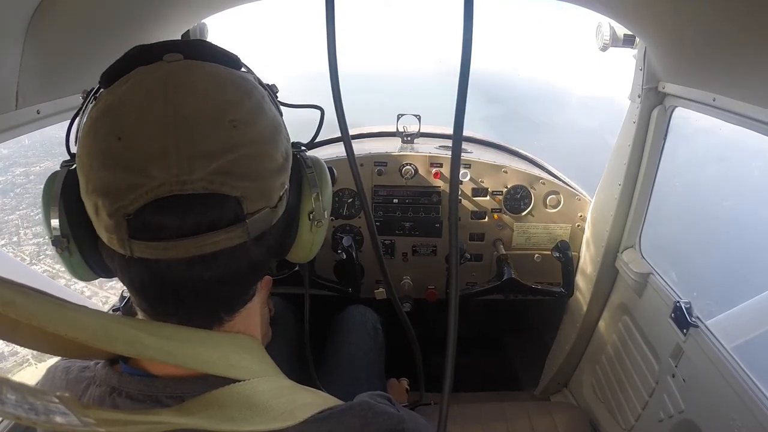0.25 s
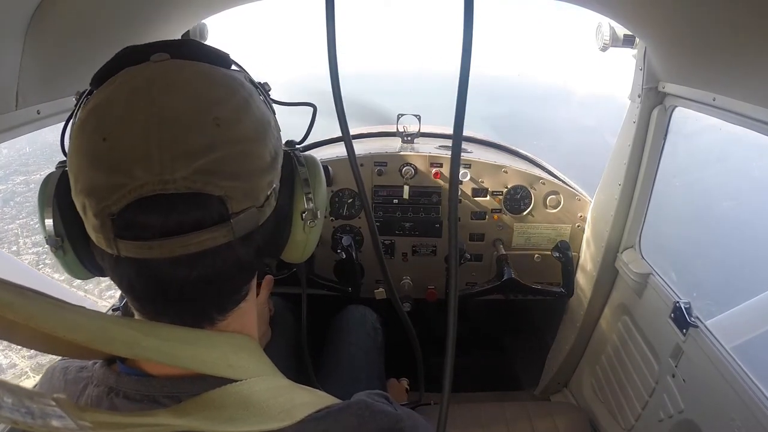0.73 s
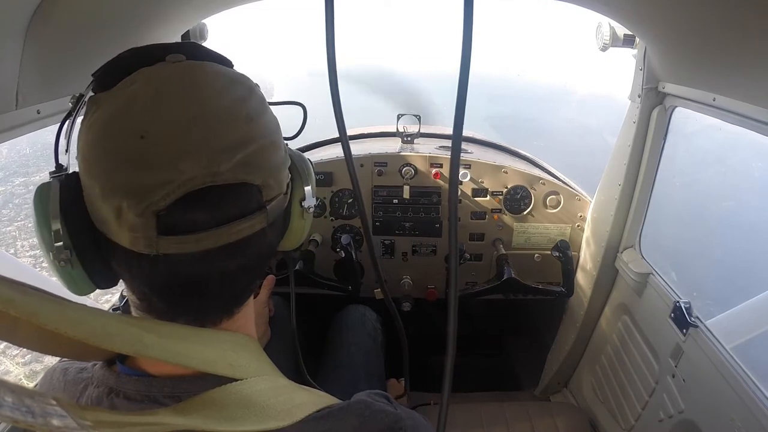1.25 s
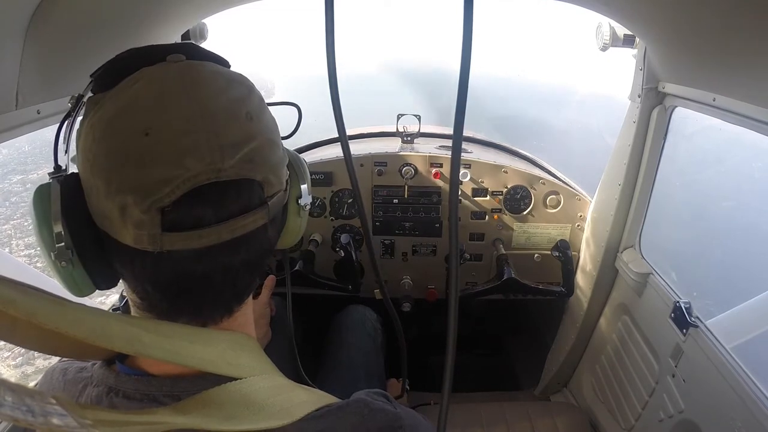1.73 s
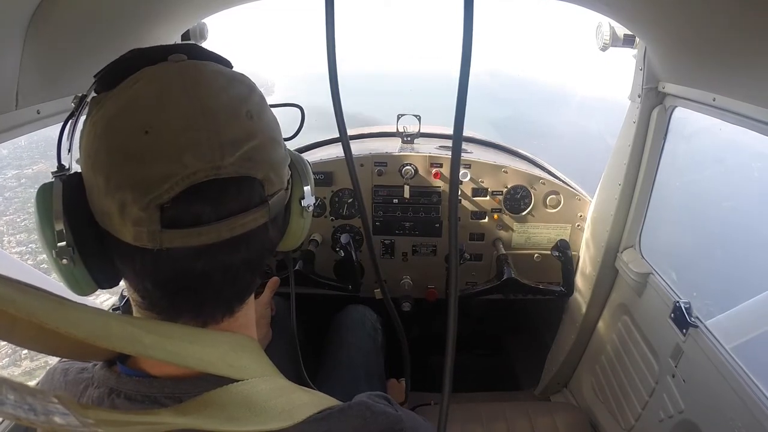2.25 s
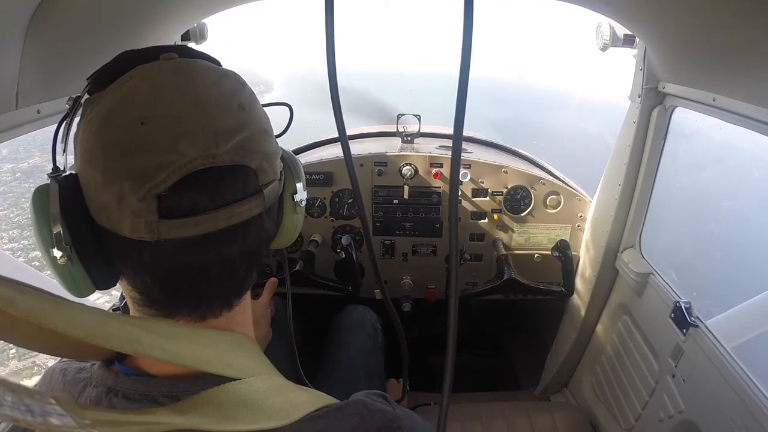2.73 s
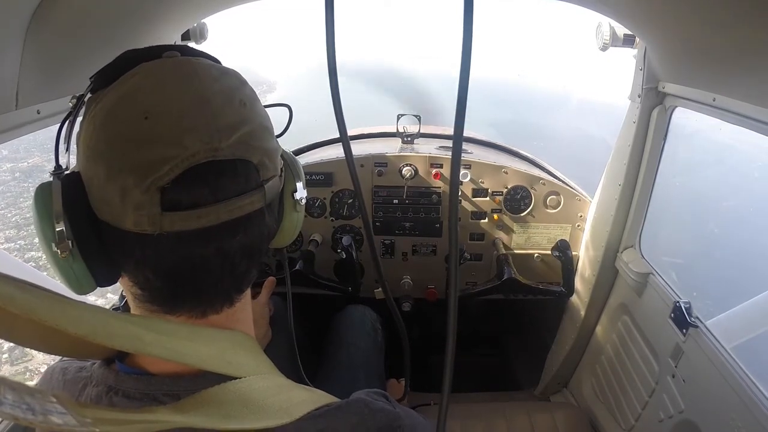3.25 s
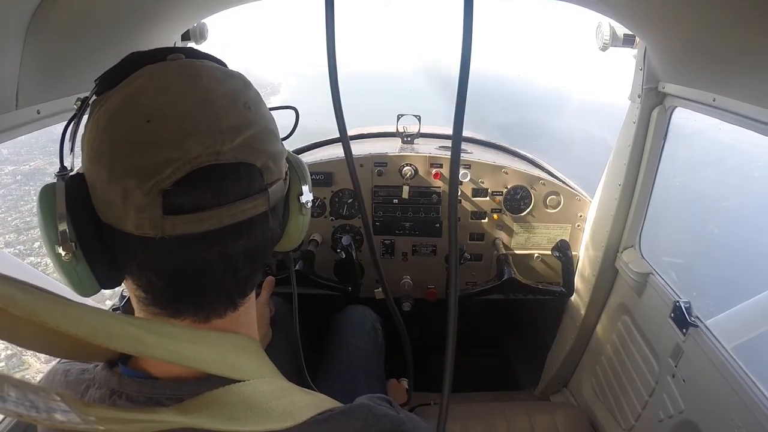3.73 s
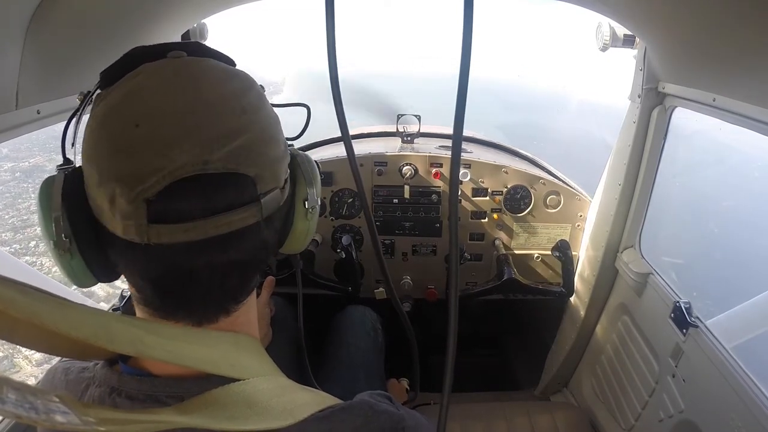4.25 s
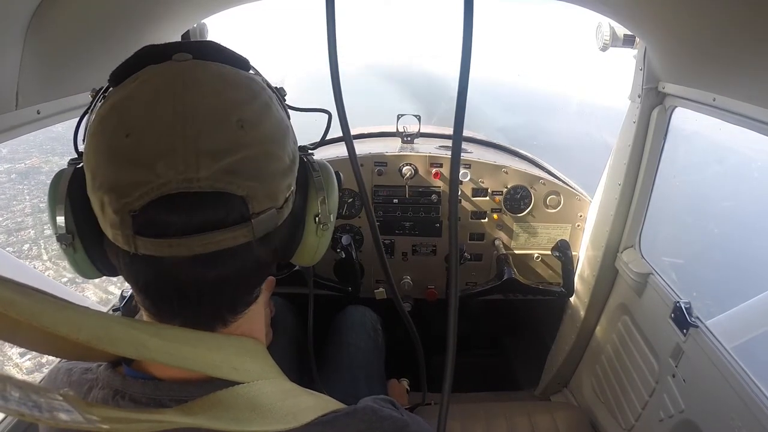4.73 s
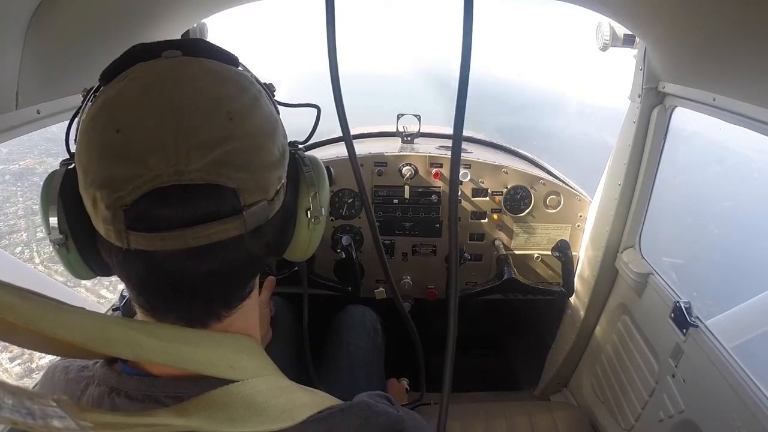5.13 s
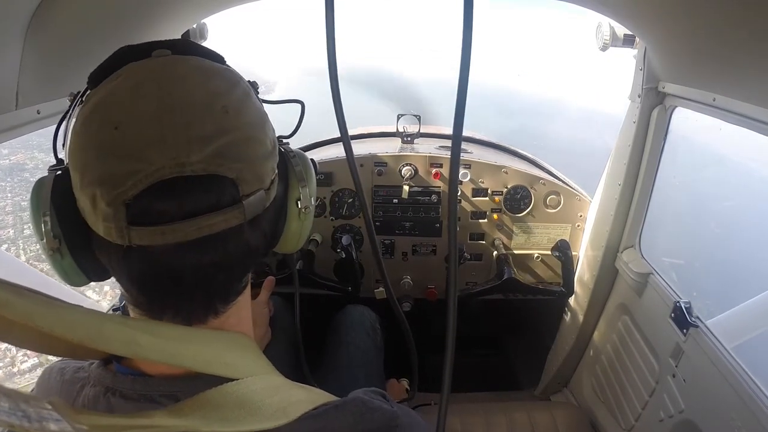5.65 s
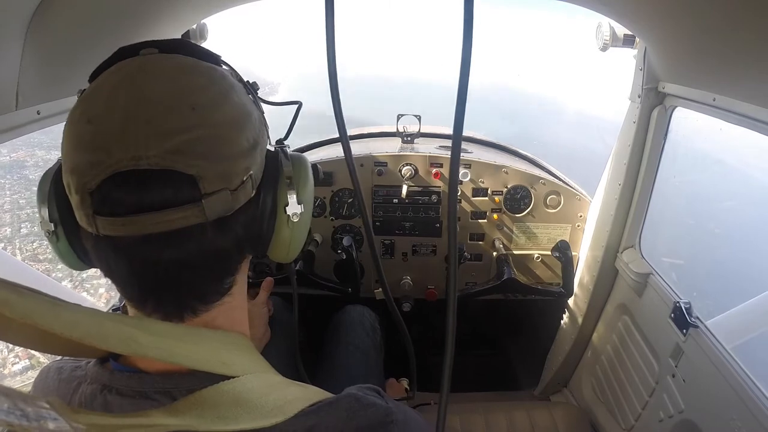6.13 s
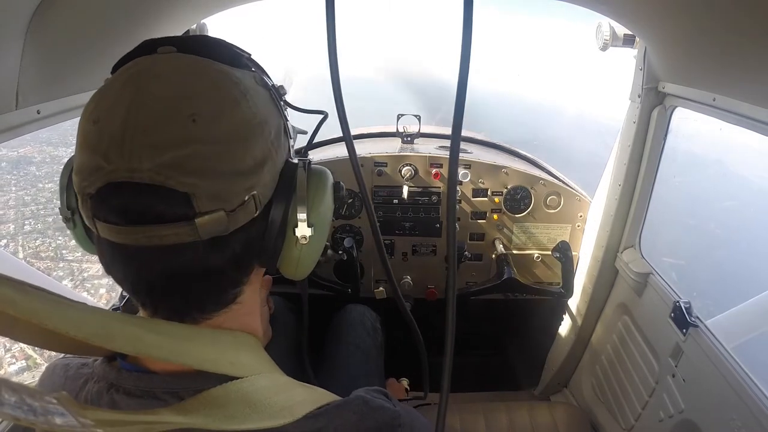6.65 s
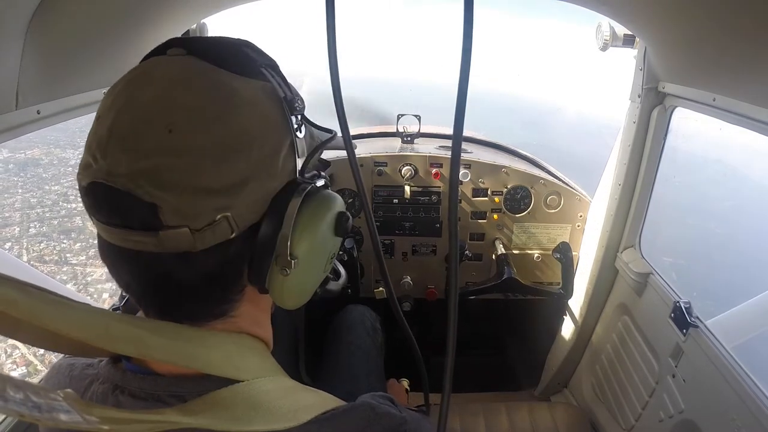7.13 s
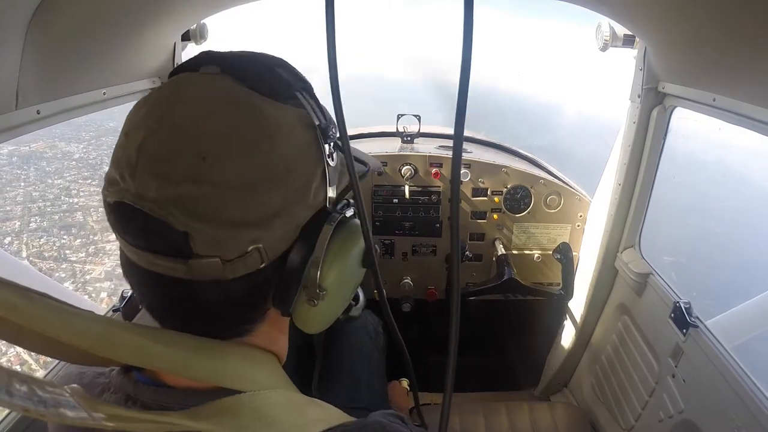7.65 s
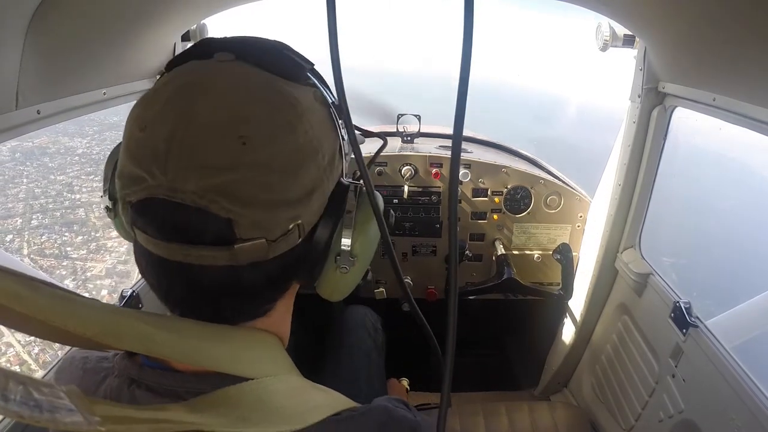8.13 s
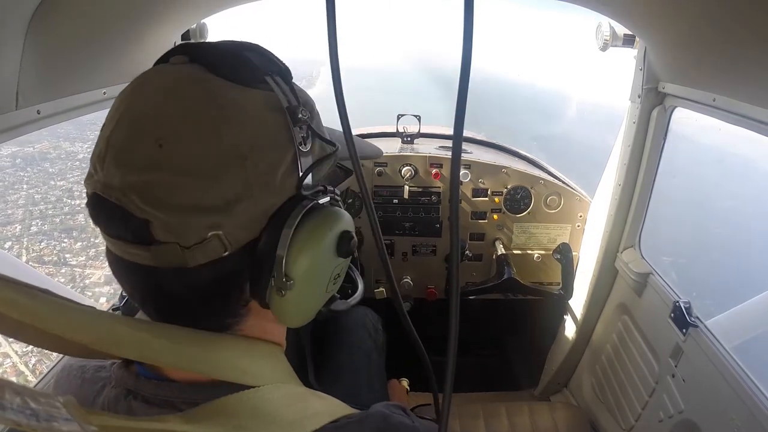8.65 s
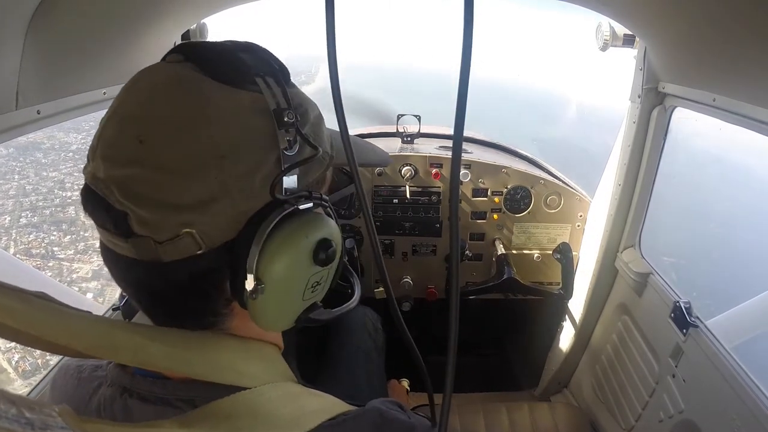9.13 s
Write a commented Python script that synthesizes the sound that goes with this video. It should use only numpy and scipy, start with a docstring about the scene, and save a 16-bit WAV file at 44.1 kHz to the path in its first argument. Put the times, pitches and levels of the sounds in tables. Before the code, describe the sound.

Inside a small propeller plane at cruise, a deep, strong engine drone near 78 hertz holds throughout. A soft raspy buzz and faint panel clatter ride above it, with low airframe rumble and wind hissing past windscreen and door seals. The air wavers slightly, more in the second half, while pitch stays almost fixed. Heard close, from behind the pilot's seat; no speech.

```python
"""Inside a light aircraft at cruise, a four-cylinder engine and two-blade propeller drone throughout.
From the start, steady tones boom and buzz, noise clatters through the panels, and air rumbles and hisses.
The air dips near 1.7 s; by about 5.3 s the engine has crept up a little and the air swells and sinks more.
Near 8 s and 9 s the engine eases briefly, while the air keeps wavering until the soft end.
Tones are sums of cosines locked to the engine cycle; clatter, cabin roar and air are filtered noise."""
import sys
import numpy as np
from scipy import signal
from scipy.fft import rfft, irfft, next_fast_len
from scipy.io import wavfile
from scipy.ndimage import uniform_filter1d, map_coordinates

SR = 44100
rng = np.random.default_rng(int(sys.argv[2]) if len(sys.argv) > 2 else 0)


def int16_out(signal):
    """Quantize to a 16-bit WAV file."""
    q = np.round(np.clip(np.atleast_2d(signal).T, -1, 1) * 32767)
    wavfile.write(sys.argv[1], SR, q.astype(np.int16))


N = 414099  # length in samples

# Engine speed, four firings to a cycle: t/s, firing rate f/Hz
ENGINE_SPEED = [(0.0, 77.61), (2.88, 77.5), (5.16, 77.96), (5.34, 78.17), (7.56, 78.18), (8.04, 77.94),
                (8.7, 78.14), (9.0, 77.8), (9.38, 78.04)]
# Low cabin tones, each stronger or weaker as engine speed moves it across cabin resonances:
# multiple of the engine cycle, relative level/dB at cruise, change in level per extra firing a second/(dB/Hz)
BOOM_TONES = [(1, -41.5, 0), (2, -47, 7), (3, -64, 4), (4, -20, -1.1), (5, -37.5, 3.5), (6, -41.5, 0),
              (8, -34.5, -2.5), (11, -36.5, 3), (12, -33, -4), (14, -46, 3), (16, -48, 5), (20, -48, 1)]
# Higher engine tones through the firewall: multiple of the engine cycle, relative level/dB
BUZZ_TONES = [(24, -55.4), (25, -58.0), (26, -58.1), (27, -57.1), (28, -55.3), (32, -56.6), (34, -55.1),
              (36, -60.6), (38, -55.5), (39, -57.0), (42, -56.3), (43, -59.8), (45, -59.5), (46, -56.5),
              (48, -54.4), (52, -60.7), (53, -60.1), (54, -59.5), (57, -58.9), (58, -57.4), (59, -54.6),
              (62, -63.6), (65, -60.0), (66, -54.5), (67, -58.4), (71, -60.9), (72, -62.7), (75, -63.9),
              (77, -63.8), (79, -64.2)]
# Cylinders in firing order, as they reach the cabin: relative level/dB
CYLINDER_LEVELS = [2, -3, 0, -2.5]
# Cabin panels shaken by the engine: centre f/Hz, width f/Hz, relative level/dB
PANEL_RESONANCES = [(552, 51, -4.5), (638, 38, -2.5), (764, 31, -4), (827, 25, -6), (918, 43, -3),
                    (1047, 40, -6), (1133.5, 42, -0.5), (1282, 33, 2), (1382, 22, -1.5), (1505, 49, -6)]
# Slipstream strength in uneven air: t/s, level/dB about its usual strength
AIR_STRENGTH = [(0.0, 0.5), (0.42, 0.4), (1.68, -1), (1.8, 0.46), (4.2, -0.5), (4.38, 1.1), (4.74, -1.1),
                (5.1, 1.5), (5.76, -1.5), (6.24, 1.4), (6.48, -1.2), (6.66, 0.7), (7.26, -0.1),
                (7.56, -1.5), (8.58, 1.4), (8.76, -1), (8.94, 1.3), (9.38, -0.1)]
# Air over windscreen and door seals: f/Hz, relative level per hertz/dB
RUSH_SPECTRUM = [(200, -32), (400, -6.5), (560, 5.5), (700, 0), (1000, -1), (1480, -2), (1700, -3),
                 (2400, -1), (3400, -2), (4500, -8.5), (5800, -10.5), (8000, -20), (10000, -29),
                 (15000, -40.5)]
# Narrow resonances of the air leaks: centre f/Hz, width f/Hz, relative level/dB
LEAK_RESONANCES = [(1743, 60, -2), (2054, 54, 3), (2322, 88, 1.5), (2630, 85, 1), (3485, 53, -5),
                   (5930, 220, -15.5)]
# Buffeted airframe: f/Hz, relative level per hertz/dB
RUMBLE_SPECTRUM = [(8, -25), (20, -10), (35, -7.5), (70, -1), (110, -3), (175, -10.5), (230, -6.5),
                   (290, -11), (400, -13), (470, -21.5), (700, -27.5), (1500, -72)]

CRUISE_HZ = 77.85  # firings a second at cruise
TOP_HZ = 15200  # highest frequency kept


def amp(db):
    """Turn decibels into a gain."""
    return 10 ** (np.asarray(db) / 20)


def unit(x):
    """Scale a sound to rms 1."""
    return x / np.sqrt(np.mean(x ** 2) + 1e-20)


def curve(rows):
    """Join (time, value) points with straight lines, giving one value per sample."""
    times, values = np.transpose(rows)
    return np.interp(np.arange(N) / SR, times, values)


def wobble(rate_hz):
    """Draw a smooth random curve through rate_hz random points a second."""
    knots = rng.standard_normal(int(N * rate_hz / SR) + 4)
    coarse = np.linspace(0, N, 8 * len(knots))
    smooth = map_coordinates(knots, [coarse * rate_hz / SR])
    return np.interp(np.arange(N), coarse, smooth)


def filtered(x, response):
    """Multiply the spectrum of x by a response, which may be complex."""
    size = next_fast_len(N + SR // 2)  # spare room at the end stops ringing from wrapping round
    hz = np.fft.rfftfreq(size, 1 / SR)
    return irfft(rfft(x, size) * response(hz), size)[:N]


def coloured(x, spectrum):
    """Shape x by (frequency, dB) points joined on a log frequency axis, at rms 1."""
    points_hz, db = np.transpose(spectrum)
    return unit(filtered(x, lambda hz: amp(np.interp(np.log(hz + 1), np.log(points_hz), db))))


def resonate(x, modes):
    """Ring x through resonances of (centre, width, dB), at rms 1."""
    def response(f):
        total = 0
        for k, (centre, width, db) in enumerate(modes):
            damping = 1j * f * width
            sign = (-1) ** k  # neighbours have opposite sign
            total = total + sign * amp(db) * damping / (centre * centre - f * f + damping)
        return total
    return unit(filtered(x, response))


def turbulence(patchy_db):
    """Make white noise with patches of random gain in time and frequency."""
    grid = signal.stft(rng.standard_normal(N), nperseg=512)[2]
    patches = uniform_filter1d(rng.standard_normal(grid.shape), size=8, axis=0)  # across frequency
    patches = uniform_filter1d(patches, size=14, axis=1)  # across time
    noise = signal.istft(grid * amp(patchy_db * unit(patches)), nperseg=512)[1]
    return unit(noise[:N])


def strokes(cycle, scatter_db):
    """Loudness in dB of the cylinder now firing; no two firings are quite alike."""
    count = len(CYLINDER_LEVELS)
    stroke = (count * cycle + .5).astype(int)
    cylinder_db = np.array(CYLINDER_LEVELS)[stroke % count]
    size_db = cylinder_db + scatter_db * rng.standard_normal(stroke[-1] + 1)[stroke]
    return uniform_filter1d(size_db - size_db.mean(), size=200)  # rounds the steps


def boom(cycle, overspeed_hz, level_db, waver_db):
    """Low tones locked to the engine; firings and blade passes coincide on every fourth multiple."""
    out = np.zeros(N)
    for multiple, db, db_per_hz in BOOM_TONES:
        k = round(multiple)
        drift_db = db_per_hz * overspeed_hz + waver_db * wobble(2.1)
        # even harmonics of the firing run a quarter turn late: each stroke pushes as hard as it pulls
        lag = np.pi / 2 * (k % (2 * len(CYLINDER_LEVELS)) == 0)
        out += amp(db + drift_db) * np.cos(2 * np.pi * k * cycle - lag)
    return np.sqrt(2) * amp(level_db) * out  # root 2 turns rms into peak


def buzz(cycle, level_db, waver_db, phase_spread, bunching):
    """Higher engine tones waver as combustion varies; slightly in step, they lean towards a rasp each cycle."""
    out = np.zeros(N)
    for multiple, db in BUZZ_TONES:
        start = rng.uniform(-np.pi, np.pi) * (1 - bunching)
        lag = start + phase_spread * wobble(7)  # radians
        tone = np.cos(2 * np.pi * round(multiple) * cycle + lag)
        out += amp(db + waver_db * wobble(4)) * tone
    return np.sqrt(2) * amp(level_db) * out


def clatter(stroke_db, level_db):
    """Noise rising and falling with the firings rings the panels and passes the firewall's middle band."""
    bursts = amp(stroke_db) * rng.standard_normal(N)
    panels = resonate(bursts, PANEL_RESONANCES)
    firewall = signal.butter(4, [400, 1600], "bandpass", fs=SR, output="sos")
    return amp(level_db) * unit(signal.sosfilt(firewall, panels))


def roar(overspeed_hz, level_db, db_per_hz, centre_hz, width_hz, flutter_db):
    """Buffeting stirs a broad, hollow cabin resonance in short flurries, harder as the propeller speeds up."""
    hollow = [(centre_hz, width_hz, 0)]
    air = resonate(resonate(rng.standard_normal(N), hollow), hollow)
    flurries = unit(amp(flutter_db * wobble(22)) * air)
    return amp(level_db + db_per_hz * overspeed_hz) * flurries


def slipstream(flow_db, cycle, rush_db, leak_db, rumble_db, flutter_db, throb_db):
    """Stronger air hisses louder at the seals, with flutter and a faint engine throb, and rumbles harder."""
    rush = amp(rush_db) * coloured(turbulence(patchy_db=0.7), RUSH_SPECTRUM)
    leaks = amp(leak_db) * resonate(turbulence(patchy_db=1.5), LEAK_RESONANCES)
    leak_band = signal.butter(4, [1500, 7000], "bandpass", fs=SR, output="sos")
    leaks = signal.sosfilt(leak_band, leaks)
    # the rumble follows the airflow a little less than the hiss does
    rumble = amp(rumble_db + .8 * flow_db) * coloured(turbulence(patchy_db=0.3), RUMBLE_SPECTRUM)
    unsteady_db = flutter_db * wobble(24) + throb_db * np.cos(2 * np.pi * cycle)
    return amp(flow_db + unsteady_db) * (rush + leaks) + rumble


def scene():
    """Mix engine and air as heard behind the pilot's seat, led by engine speed and slipstream strength."""
    firing_hz = curve(ENGINE_SPEED)
    flow_db = curve(AIR_STRENGTH)
    overspeed_hz = firing_hz - CRUISE_HZ
    cycle = np.cumsum(firing_hz) / SR / len(CYLINDER_LEVELS)  # engine cycles so far
    stroke_db = strokes(cycle, scatter_db=1.66)
    drone = boom(cycle, overspeed_hz, level_db=-0.03, waver_db=0.33)
    rasp = buzz(cycle, level_db=1.2, waver_db=1.6, phase_spread=.25, bunching=.12)
    rasp = amp(.3 * stroke_db) * rasp  # follows the firings gently
    rattle = rasp + clatter(stroke_db, level_db=-39.0)
    hollow = roar(overspeed_hz, level_db=-38.0, db_per_hz=1.5, centre_hz=363.7, width_hz=121, flutter_db=1.5)
    air = slipstream(flow_db, cycle, rush_db=-37.0, leak_db=-49.5, rumble_db=-31.5,
                     flutter_db=0.62, throb_db=.35)
    return (drone + amp(flow_db) * (rattle + hollow) + air)[None]


def record(dry):
    """Fade both ends over 4 ms and remove everything from TOP_HZ upward."""
    to_nearest_end_s = np.minimum(np.arange(N), np.arange(N)[::-1]) / SR
    faded = dry[0] * np.clip(to_nearest_end_s / .004, 0, 1)
    return filtered(faded, lambda hz: hz < TOP_HZ)[None]


dry = scene()
out = record(dry)
int16_out(out)
```